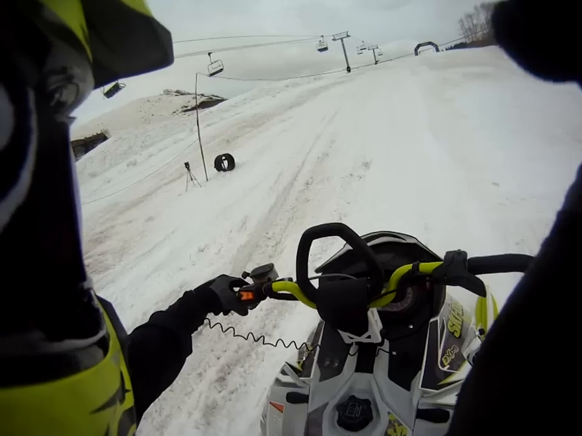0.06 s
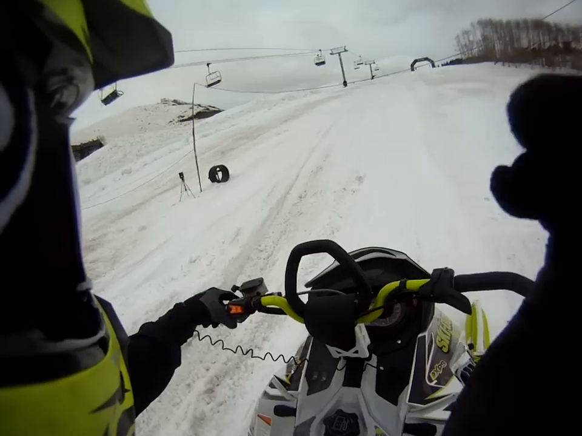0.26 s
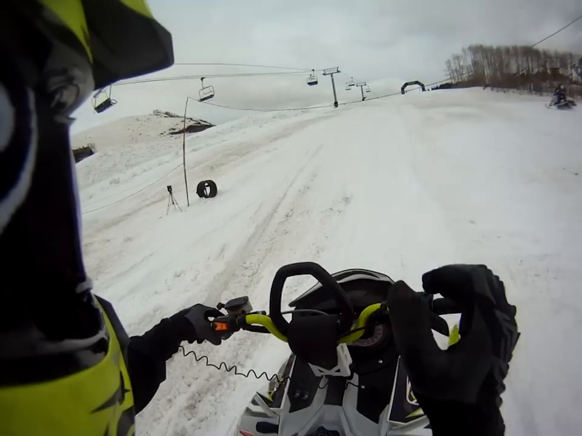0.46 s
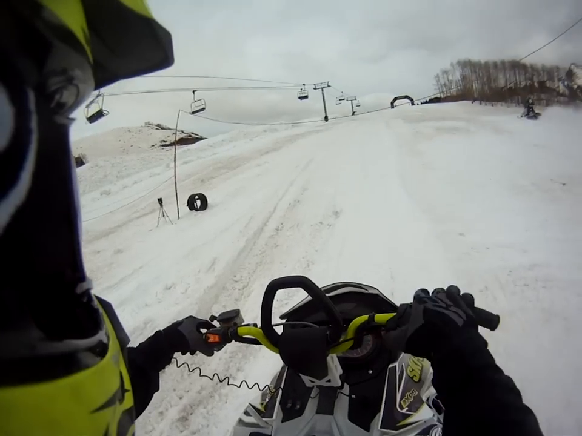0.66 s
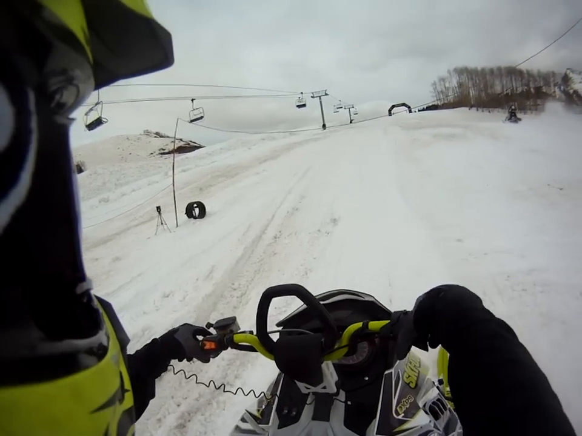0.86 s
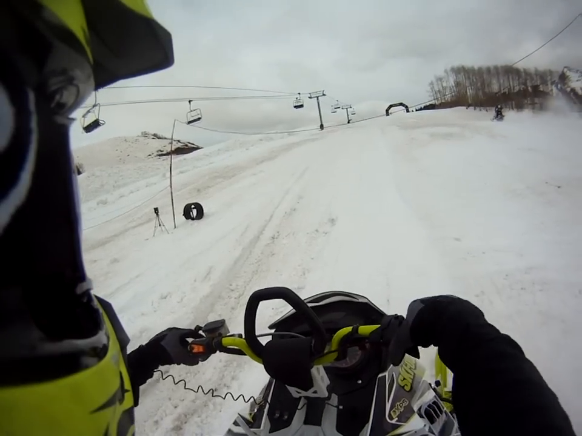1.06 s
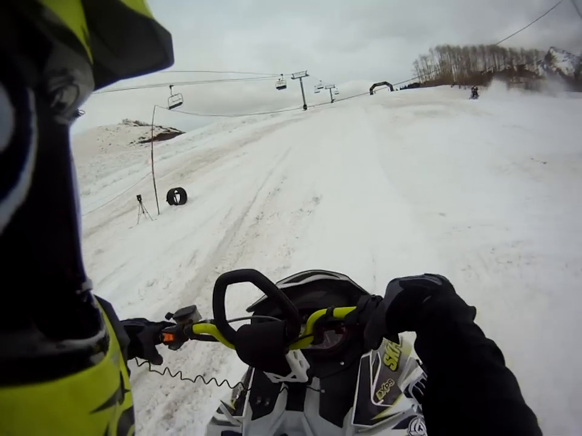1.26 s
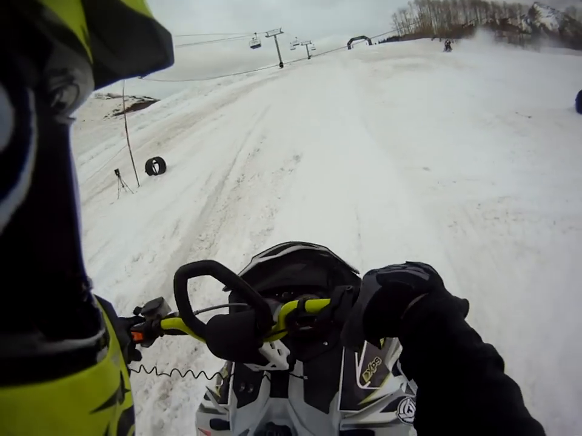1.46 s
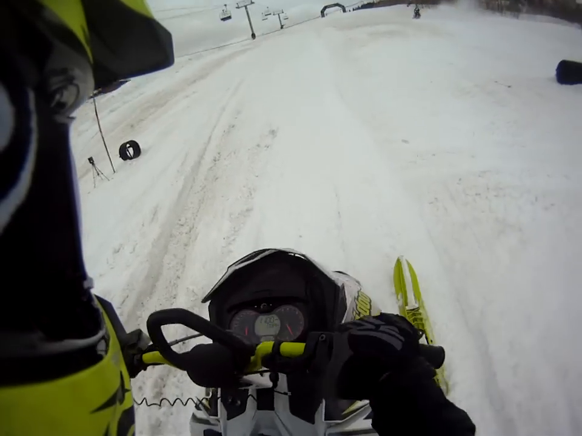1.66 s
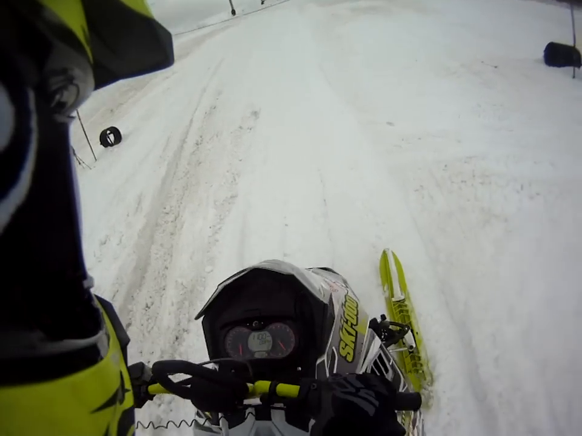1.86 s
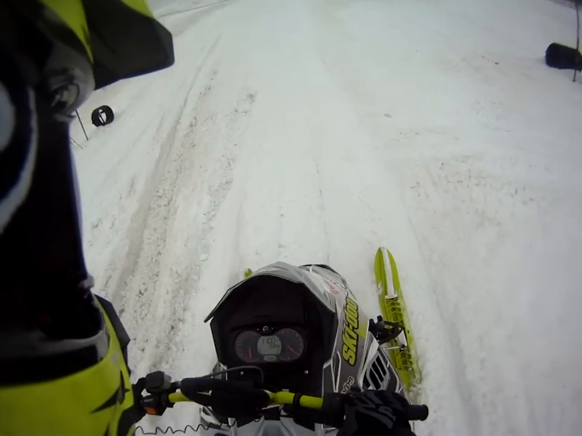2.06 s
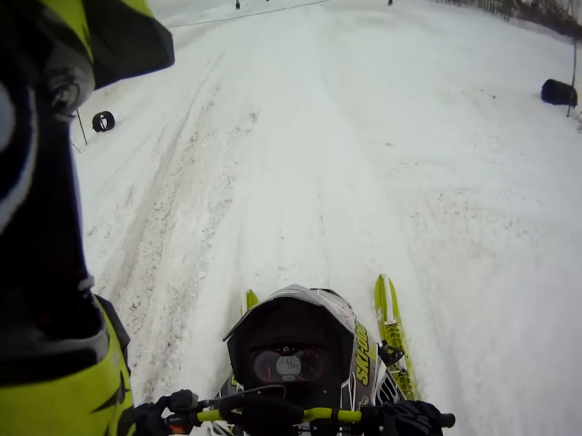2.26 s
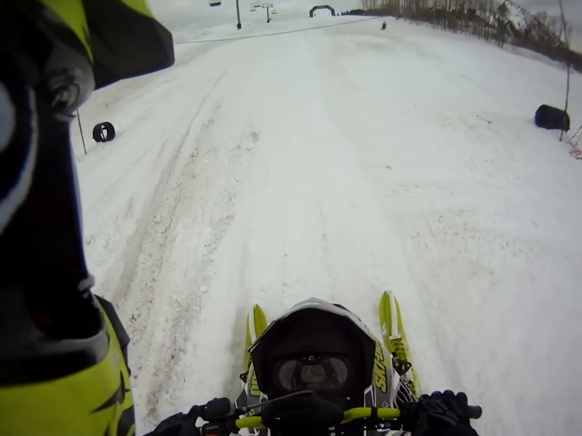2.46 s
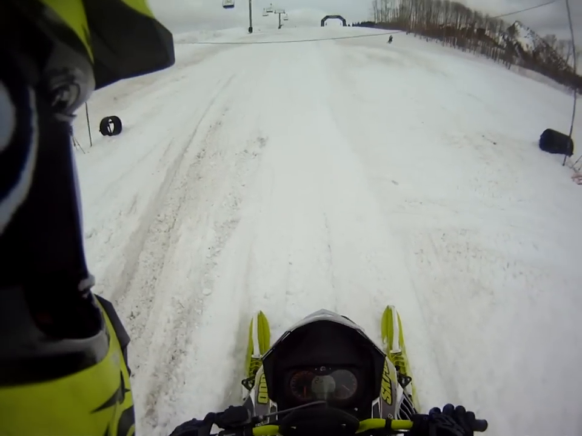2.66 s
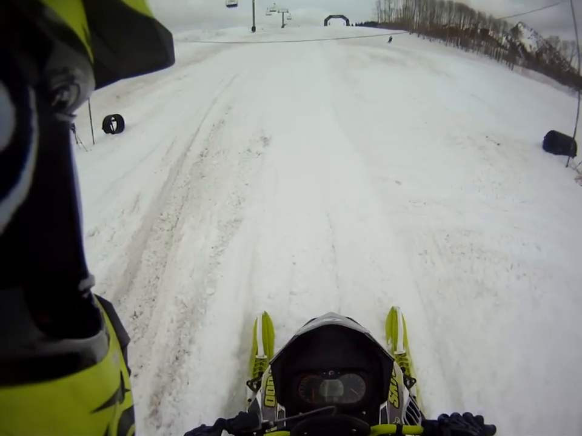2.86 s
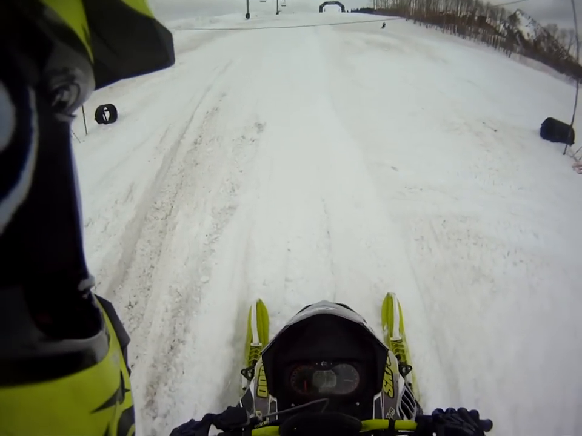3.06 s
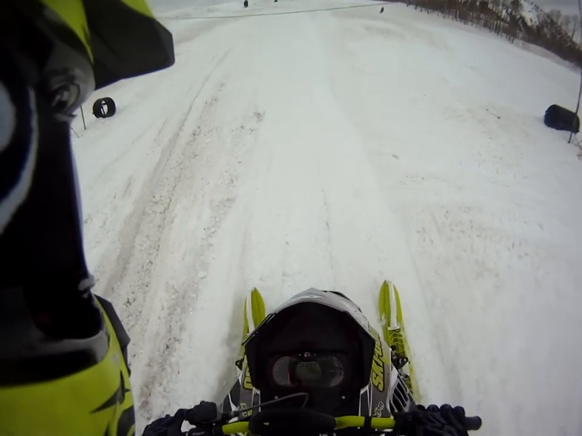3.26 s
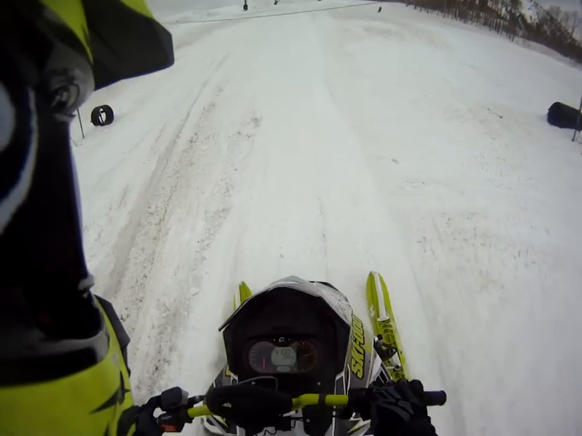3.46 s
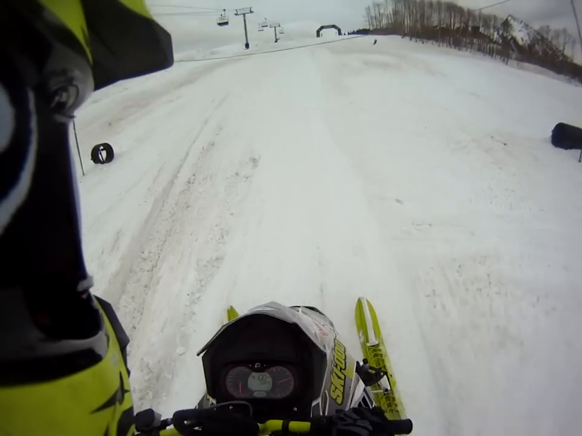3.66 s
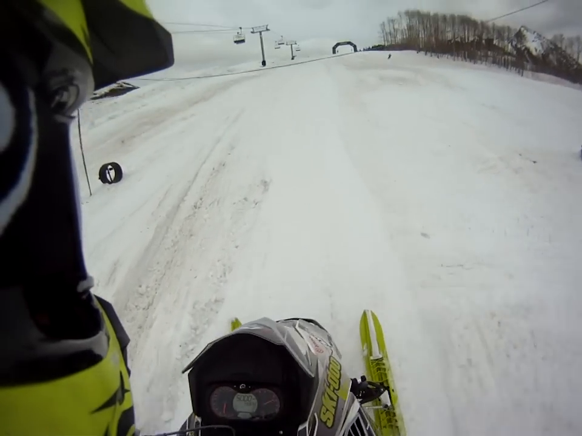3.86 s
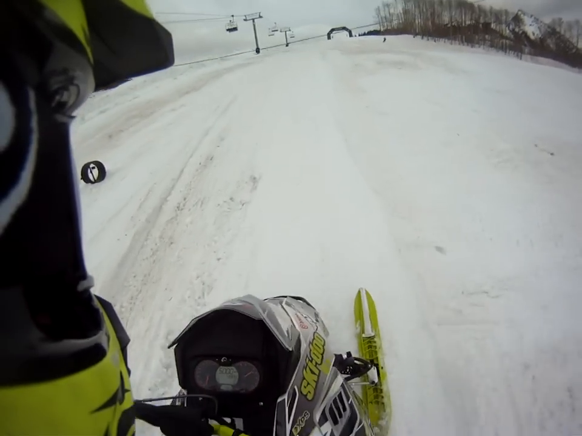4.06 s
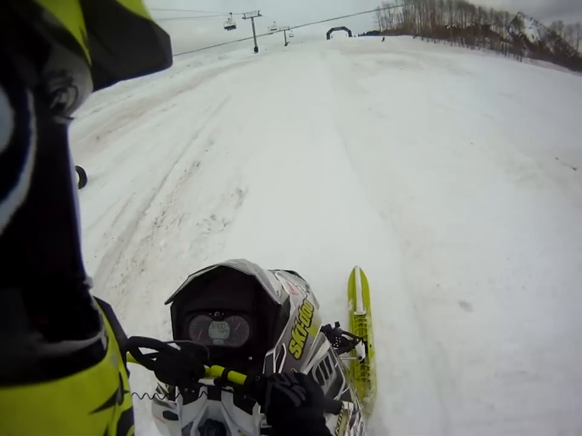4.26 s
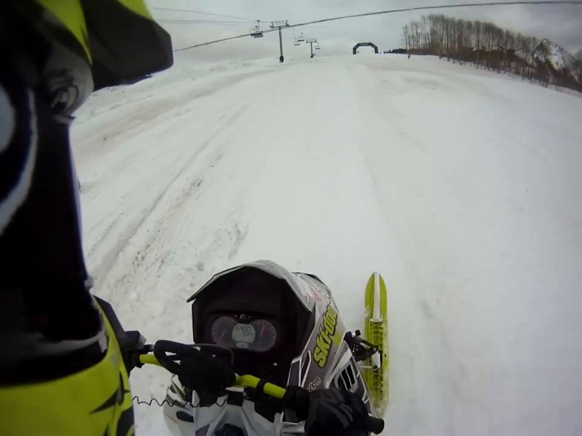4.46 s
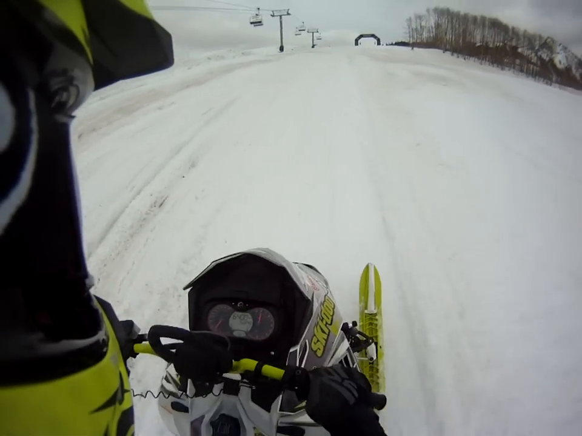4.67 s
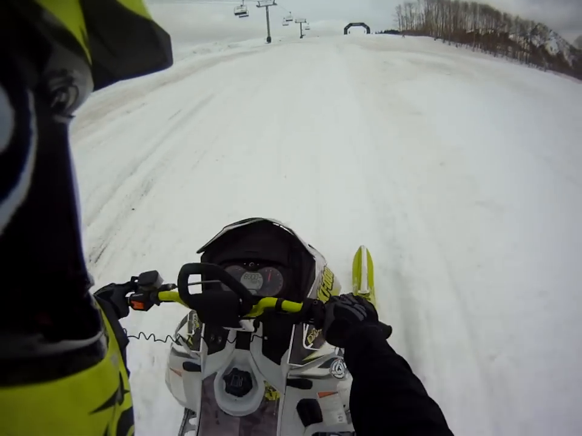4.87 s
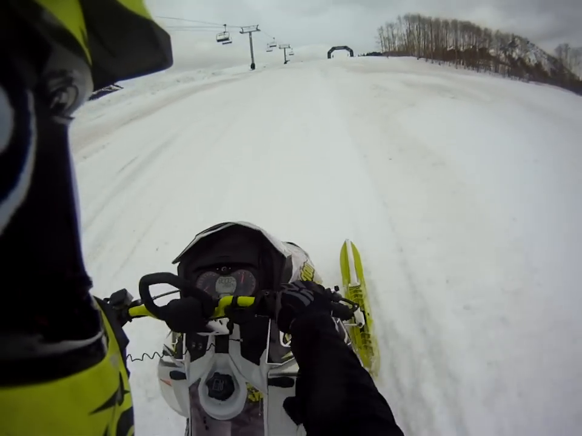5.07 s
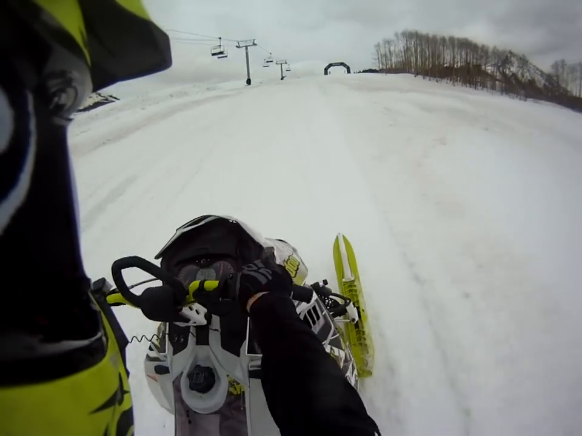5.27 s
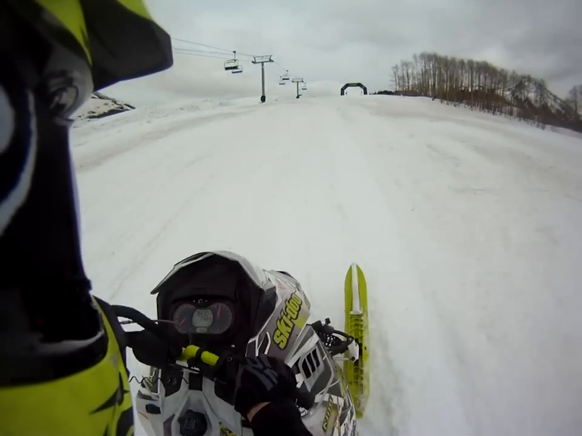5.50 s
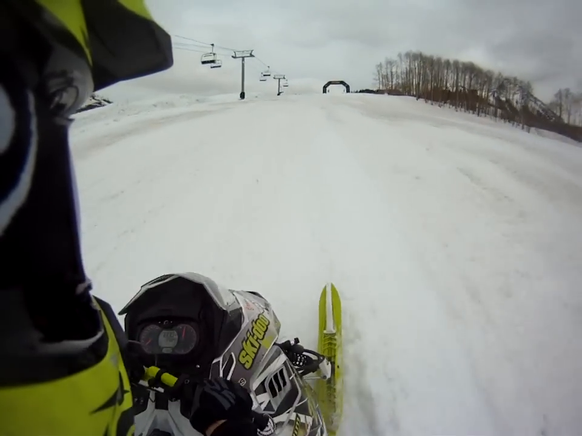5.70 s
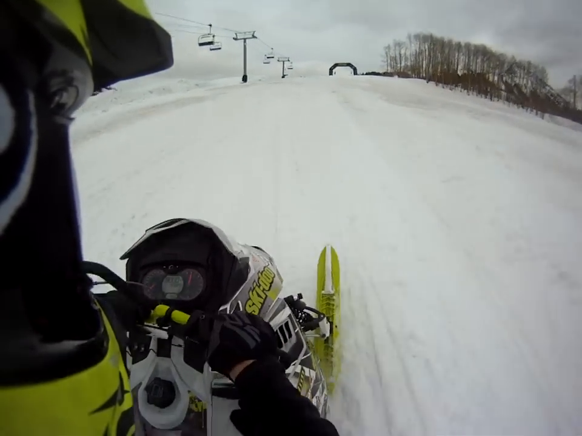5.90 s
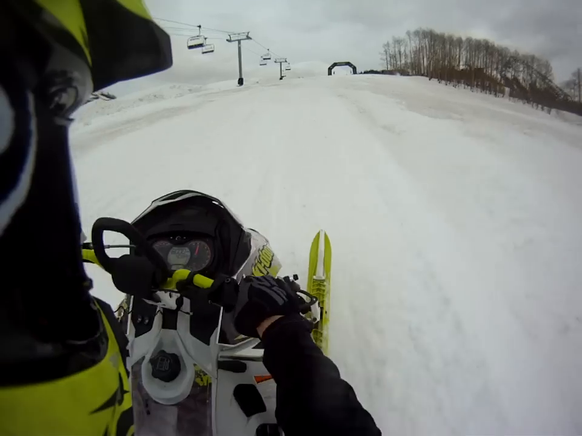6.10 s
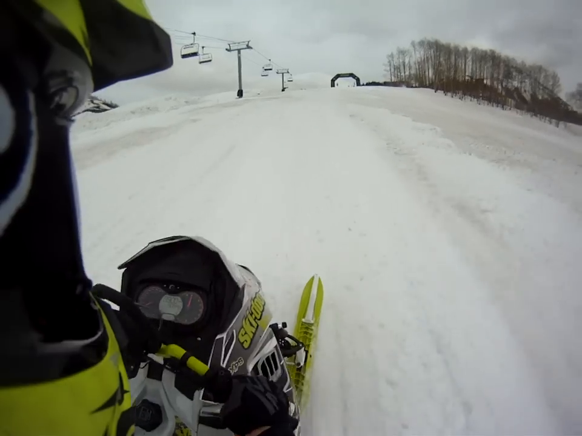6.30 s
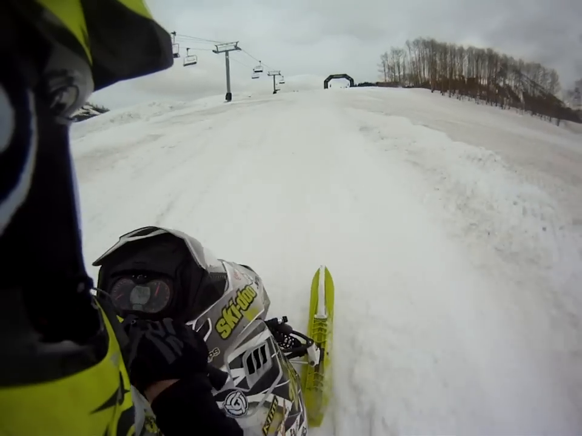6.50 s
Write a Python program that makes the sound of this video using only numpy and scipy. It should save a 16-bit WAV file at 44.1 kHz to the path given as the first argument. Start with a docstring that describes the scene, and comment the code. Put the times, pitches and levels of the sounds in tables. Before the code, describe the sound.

A two-stroke snowmobile idles with a low, gruff putter, heard close and dry from the rider's helmet. Nylon swishes at the start, and at about 0.2 seconds a glove hits the microphone with a loud clack, thuds and scuffs, leaving a brief low hum. Softer sleeve swishes fade by 1.5 seconds. At 1.6 seconds the engine revs up with a booming bark, easing off at 2 seconds with a few small pops. From 2.4 to 4 seconds, about six quick throttle blips push the pitch higher, with raspy intake, drive whirr and short dips between them. After a brief cut at 4 seconds, the throttle opens fully and the engine climbs into a loud, high howl by 4.5 seconds, holding with a slight waver until the end, around 6.5 seconds. Track hiss, churning snow and a thin sizzle build underneath, with low wind gusts near 5 and 6.5 seconds.

```python
"""Snowmobile pulling away

A two-stroke twin, heard from the rider's helmet, idles, is blipped, surges off and climbs at full revs.
Firings boom and bark in the exhaust until the tuned pipe howls; intake rasp, drive whirr, track noise
and wind rise along the way. At the start nylon swishes and a glove knocks and scuffs the camera,
whose slow sample-and-hold mirrors everything into a thin treble sizzle."""
import sys
import numpy as np
from scipy import signal
from scipy.fft import rfft, irfft
from scipy.io import wavfile
from scipy.ndimage import uniform_filter1d

SR = 44100
rng = np.random.default_rng(int(sys.argv[2]) if len(sys.argv) > 2 else 0)


def inscribe(sig):
    """Save sig as 16-bit PCM at rate SR to the path in sys.argv[1].

    A 1-D sig is mono; a 2-D sig holds one channel per row.
    Samples are clipped to [-1, 1] before scaling.
    """
    pcm = np.round(np.clip(np.atleast_2d(sig).T, -1, 1) * 32767)
    wavfile.write(sys.argv[1], SR, pcm.astype(np.int16))


N = 288414
T = np.arange(N) / SR


def undb(db):
    """Decibels to gain."""
    return np.exp(np.asarray(db) * np.log(10) / 20)


def curves(rows, at=T):
    """A table's later columns, interpolated along its first (time by default)."""
    keys, *columns = np.transpose(rows)
    return [np.interp(at, keys, column) for column in columns]


def noise():
    """White noise."""
    return rng.standard_normal(N)


def walk(rate):
    """Smooth random modulation: a new value every 1 / rate s, spread near 1."""
    hold = max(int(SR / rate), 1)
    held = np.repeat(rng.standard_normal(size=8192)[:N // hold + 1], hold)[:N]
    return 1.19 * uniform_filter1d(uniform_filter1d(held, hold), hold)


def ramp(start_s, length_s):
    """A linear rise from 0 to 1."""
    return np.clip((T - start_s) / length_s, 0, 1)


def swell(s, half_s):
    """A bell-shaped envelope around time s."""
    return np.exp(-.5 * ((T - s) / half_s) ** 2) * (np.abs(T - s) < 6 * half_s)


def colour(x, points):
    """Ring x through a resonant body with this EQ curve; rms 1."""
    size = 16384
    hz, db = np.transpose(points)
    grid = np.maximum(np.arange(size // 2 + 1) * SR / size, 1)
    rolloff_db = 40 * np.log10(np.maximum(grid / hz[-1], 1))
    gain = undb(np.interp(np.log(grid), np.log(hz), db) - rolloff_db)
    cepstrum = irfft(np.log(gain))
    cepstrum[1:size // 2] *= 2  # minimum phase: the ring follows the hit
    cepstrum[size // 2 + 1:] = 0
    rung = signal.fftconvolve(x, irfft(np.exp(rfft(cepstrum))))[:N]
    return rung / np.std(rung)


def even(x):
    """Hold the rms at 1 whatever the firing rate."""
    size = SR // 16
    return x / np.sqrt(uniform_filter1d(uniform_filter1d(x * x, size), size) + 1e-9)


# Low wind buffet (frequency [Hz], level [dB])
BUFFET_EQ = [(15, -11), (28, -12), (39, -6), (52, -17), (90, -17), (200, -55), (600, -63)]
# Gusts, jolts and a lull (time [s], level change [dB], half length [s])
GUSTS = [(4.321, -4, 0.097), (5.09, 10, 0.063), (6.479, 7, 0.15)]
def wind(rest_db=-49.5, rise_db_per_s=1.45, rolls_s=1.6):
    """Air and the ride shake the helmet, more once the sled rolls."""
    bed_db = rest_db + rise_db_per_s * np.maximum(T - rolls_s, 0)
    gust_db = sum(db * swell(s, half) for s, db, half in GUSTS)
    return colour(noise(), BUFFET_EQ) * undb(bed_db + gust_db + 0.66 * walk(9))


# Papery jacket cloth (frequency [Hz], level [dB])
RUSTLE_EQ = [(500, -12), (1100, -4), (1750, 5.5), (2300, -16), (2800, -6), (3600, -4), (5000, -12.5)]
def jacket(level_db=-45.5, fades_s=0.59, fade_db_per_s=15):
    """A broad rustle of cloth that dies away as the arm settles."""
    fade_db = fade_db_per_s * np.maximum(T - fades_s, 0)
    return colour(noise(), RUSTLE_EQ) * ramp(0.035, 0.13) * undb(level_db - fade_db)


# The arm reaches for the bar (time [s], level [dB], half length [s], centre [Hz])
SWISHES = [(0.03, -43, 0.05, 2470), (.125, -42.5, 0.047, 2400), (0.144, -45, 0.12, 1800),
           (0.497, -51, 0.17, 3640), (1.03, -54.5, 0.073, 3824), (1.331, -60, 0.096, 4570)]
def sleeve(skirt_db=-15.5):
    """Ribbed nylon slides on itself: each stroke hisses around its own pitch."""
    out = np.zeros(N)
    for s, db, half, hz in SWISHES:
        band = [(hz / 2, 2 * skirt_db), (hz / 1.22, skirt_db), (hz, 0),
                (hz * 1.05, skirt_db), (hz * 2, 2 * skirt_db)]
        out += colour(noise(), band) * undb(db) * swell(s, half)
    return out


# Bright shell clack and dull glove scrape (frequency [Hz], level [dB])
CLACK_EQ = [(100, -3), (260, -1), (450, -8), (700, -5), (1500, 0), (2300, 0), (2800, -6), (3450, 7),
            (3950, -7), (5500, -10)]
SCUFF_EQ = [(200, -17), (550, -10), (900, -1.5), (1700, 6), (2200, 4.5), (2700, -25), (3700, -28),
            (4400, -21), (5000, -11), (5600, -27)]
# Hits and slides on the shell (time [s], level [dB], half length [s])
KNOCKS = [(.197, -21, .0016), (.203, -29, .002), (.2117, .5, .0019), (.2143, -9, .0009)]
SCUFFS = [(.18, -38, .03), (.272, -26, .009), (.287, -20, .006), (.327, -30, .008)]
# Thuds of the shoved helmet (time [s], envelope level [dB], pitch [Hz])
SHOVES = [(.147, -23, 90), (.17, -18, 40), (.1935, -11, 60), (.1958, -11, 190), (.2115, -6.5, 160),
          (.246, -18, 100)]
def glove(ring_hz=69.3, ring_db=-24.0, ring_t60=1.2):
    """The hand knocks, scuffs and shoves the camera, and leaves its mount humming."""
    knocks = colour(noise(), CLACK_EQ) * sum(undb(db) * swell(s, half) for s, db, half in KNOCKS)
    grip = undb(3 * walk(500))
    scuffs = colour(noise() * grip, SCUFF_EQ) * sum(undb(db) * swell(s, half) for s, db, half in SCUFFS)
    shoves = sum(undb(db) * swell(s, 0.25 / hz) * np.sin(2 * np.pi * hz * (T - s))
                 for s, db, hz in SHOVES)
    hum_attack = np.interp(T, [.22, .28, .38], [0, .7, 1])
    hum_db = ring_db - 60 * np.maximum(T - .39, 0) / ring_t60
    hum = hum_attack * undb(hum_db) * np.sin(2 * np.pi * ring_hz * T)
    return knocks + scuffs + shoves + hum


# Throttle squeezes (opens [s], shuts [s], attack [s], opening [0-1],
# starting firing rate [Hz], peak firing rate [Hz], dip on letting go [dB])
BLIPS = [(1.64, 2.013, 0.19, 0.82, 38.72, 92.74, -4), (2.422, 2.589, 0.041, 0.36, 77.9, 84.6, -1),
         (2.722, 2.856, .05, 0.11, 80.1, 86.8, -6), (2.925, 3.2, 0.13, 0.8, 84.9, 153.7, -3),
         (3.277, 3.436, 0.042, 0.65, 151.3, 177.2, -1.5), (3.522, 3.662, 0.033, 0.63, 165.3, 180.3, -5),
         (3.763, 3.956, 0.079, 0.93, 163.8, 199.6, -26)]
def throttle(pinned_s=4.04, pinned_attack_s=0.035, release_s=0.024, cut_delay_s=0.064):
    """The thumb blips, then holds full throttle; the firing cuts out briefly after each blip."""
    opening, cut_db = ramp(pinned_s, pinned_attack_s), 0
    for opens, shuts, attack, depth, _, _, drop_db in BLIPS:
        opening = opening + depth * ramp(opens, attack) * (1 - ramp(shuts, release_s))
        cut_db = cut_db + drop_db * swell(shuts + cut_delay_s, half_s=0.019)
    return opening, cut_db


# Engine pitch on the climb (time [s], firing rate [Hz])
CLIMB = [(4.05, 181.3), (4.15, 207.8), (4.21, 219.8), (4.36, 255.2), (4.42, 262.8), (4.51, 271.5),
         (4.62, 269.3), (4.75, 272.7), (4.96, 267.5), (5.07, 265.9), (5.25, 261.7), (5.58, 267.9),
         (5.68, 268.9), (5.89, 264.6), (6.04, 257.2), (6.11, 261.9), (6.25, 271.3), (6.48, 261.9),
         (6.54, 263.6)]
def revs(idle_hz=37.49, idle_drift=0.01198, overrun_s=.018):
    """Firing rate: the crank winds up with each squeeze and coasts to the next, until the climb."""
    first_blip_s = BLIPS[0][0]
    marks = [(0, idle_hz), (first_blip_s - .25, idle_hz)]
    for opens, shuts, _, _, before_hz, peak_hz, _ in BLIPS:
        marks += [(opens, before_hz), (shuts + overrun_s, peak_hz)]
    s, hz = np.transpose(marks + [CLIMB[0]])
    steps = np.arange(len(s))
    leg, part = np.divmod(np.interp(T, s, steps), 1)
    eased = np.interp(leg + np.sin(np.pi * part / 2) ** 2, steps, hz)
    wander = 1 + idle_drift * walk(6) * (1 - ramp(first_blip_s, 0.099))
    return np.where(T < s[-1], eased * wander, curves(CLIMB)[0])


def firings(cycles, hz):
    """One pulse per firing, each with its own punch; at higher revs one cylinder hits harder."""
    scatter_db = np.interp(hz, [38, 85, 160], [1.5, 2.2, 1.1])
    limp_db = np.interp(hz, [100, 165, 230], [0, 1.6, .8])
    at = np.flatnonzero(np.diff(np.floor(cycles)) > 0)
    count = np.ceil(cycles[at])
    late = (count - cycles[at]) / (cycles[at + 1] - cycles[at])  # fraction of a sample
    punch = undb(scatter_db[at] * noise()[:len(at)] + limp_db[at] * np.cos(np.pi * count))
    pulses = np.zeros(N)
    pulses[at], pulses[at + 1] = punch * (1 - late), punch * late
    return pulses


def puffs(cycles, decay, steady):
    """Noise that bursts at each firing and sinks towards a steady floor."""
    return noise() * (steady + np.exp(-(cycles % 1) / decay))


# Echoes in the expansion chamber and silencer (round trip [s])
ROUND_TRIPS = (.0021, .0034, .0053)
def chambers(x, echo):
    """Each pulse bounces to and fro and leaves as a train of echoes."""
    for trip_s in ROUND_TRIPS:
        size = int(trip_s * SR)
        trips = np.pad(x, (0, -N % size)).reshape(-1, size)
        x = signal.lfilter([-echo, 1], [1, -echo], trips, axis=0).ravel()[:N]
    return x


# Track sizzle and churning snow (frequency [Hz], level [dB])
HISS_EQ = [(1200, -31), (2300, -1), (2600, -7.5), (3100, -6), (3500, 1), (3750, -4), (4100, -6.5),
           (4700, -14.5), (5050, -11), (5400, -4), (5900, -12)]
ROAR_EQ = [(50, -7), (130, -7.5), (230, 2), (400, -6), (560, -1), (720, 1), (950, 0.5), (1400, -3),
           (2500, -24)]
def track(cycles, train, hz, level_db):
    """The track hisses, buzzier with revs, and its roar in the snow swells as the sled rolls."""
    tonal = np.interp(hz, [80, 250], [.05, .42])
    spray = np.sqrt(1 - tonal) * even(colour(puffs(cycles, decay=1.0, steady=1.0), HISS_EQ))
    buzz = np.sqrt(tonal) * even(colour(train, HISS_EQ))
    hiss = (spray + buzz) * undb(level_db + 1.5 + 0.98 * walk(35))
    rolling_db = np.interp(T, [1.6, 3.1], [-7, 0])
    roar = colour(noise(), ROAR_EQ) * undb(level_db - 4.5 + 0.92 * walk(12) + rolling_db)
    return hiss + roar


# Narrow midrange whirr (frequency [Hz], level [dB])
WHIRR_EQ = [(700, -20.5), (980, -27.5), (1100, -2), (1180, 0), (1240, -2), (1330, -24.5), (1700, -30.5)]
def drive(hz, level_db, waver_db=1.0):
    """Belt and chain case whirr, grainier with speed and ducking a little at peak revs."""
    grain_db = np.interp(hz, [40, 160], [.3, 1.4])
    duck_db = 1.7 * np.clip((hz - 232) / 26, 0, 1)
    whirr = colour(noise() * undb(grain_db * walk(60)), WHIRR_EQ)
    return whirr * undb(level_db + waver_db * walk(7.9) - duck_db)


# Airbox ring: broad under the gas, narrow under the pulses (frequency [Hz], level [dB])
RASP_EQ = [(700, -50.5), (1300, -19.5), (1500, -2), (1600, -3.5), (1670, -10), (1820, 6), (1950, -3.5),
           (2100, 2), (2280, -6), (2550, -37.5), (4000, -48)]
AIRBOX_EQ = [(1000, -27), (1400, -14.5), (1540, -1.5), (1660, -18.5), (1780, 3.5), (1880, 2), (1990, -1.5),
             (2140, -14), (2300, -57), (2700, -26.5)]
def intake(cycles, train, hz, level_db):
    """Gas rasps and the airbox snarls with the firings; at peak revs the snarl yields to the howl."""
    rates_hz = [40, 70, 170, 228, 258]
    gas_db = level_db + np.interp(hz, rates_hz, [-1, -4, -5.5, -6.5, -6.5])
    snarl_db = level_db + np.interp(hz, rates_hz, [-12, -2.5, -1.5, -1, -13])
    gas = even(colour(puffs(cycles, decay=.3, steady=.5), RASP_EQ)) * undb(gas_db)
    snarl = even(colour(train, AIRBOX_EQ)) * undb(snarl_db)
    return gas + snarl


# Exhaust low end, throat and edge (frequency [Hz], level [dB])
BOOM_EQ = [(30, -38), (75, -27), (110, 7), (150, 8.5), (185, -5), (230, -6), (400, -52)]
BARK_EQ = [(150, -21.5), (250, 1.5), (330, -0.5), (385, 0.5), (430, 2), (480, -1), (530, 8), (590, 1.5),
           (690, -16), (850, -8), (950, -10), (1400, -54.5)]
BITE_EQ = [(500, -15), (700, -9), (790, 0.5), (880, 6.5), (1060, -11), (1200, 4), (1450, -21)]
def exhaust(cycles, pulses, hz, opening, cut_db, boom_db, bark_db):
    """Firings thump the silencer and bark in the pipe: gruff at idle, cleaner and brighter with revs."""
    rough_zone = np.exp(-((hz - 87) / 20) ** 2)  # off load the engine stumbles around 87 Hz
    drop_db = cut_db + 4 * walk(28.1) * (1 - opening) * rough_zone
    boom = even(colour(pulses, BOOM_EQ))
    train = chambers(pulses, echo=0.46)
    clean = np.interp(hz, [40, 90, 160], [.6, .92, .98])
    gruff = even(colour(puffs(cycles, decay=0.41, steady=0.13), BARK_EQ))
    bark = np.sqrt(clean) * even(colour(train, BARK_EQ)) + np.sqrt(1 - clean) * gruff
    bite = even(colour(train, BITE_EQ)) * undb(np.interp(hz, [90, 140, 175], [-22, -10, -4]))
    # the bark dips less than the boom: the coasting engine still pumps the pipe
    return boom * undb(boom_db + drop_db) + (bark + bite) * undb(bark_db + 0.88 * drop_db)


# Lone hard firings on the overrun (time [s], level [dB])
POPS = [(2.112, -31), (2.125, -36), (2.204, -40), (2.666, -41)]
def pops(decay_s=0.0083):
    """A late charge lights and cracks through pipe and intake."""
    burst = sum(undb(db) * np.exp(-np.abs(T - s) / decay_s) * (T >= s) for s, db in POPS)
    return burst * (colour(noise(), BARK_EQ) + 0.72 * colour(noise(), RASP_EQ))


# The howl's strong harmonics (multiple of the firing rate)
HOWL_ORDERS = (1, 2, 3, 4, 6, 7, 8)
# Their voicing (level [dB], echo fading depth [factor], random dropout depth [dB])
HOWL_VOICING = [(-26.5, 2.46, 0.4), (-21.5, 1.45, 1), (-21.5, 1.81, .2), (-22, 1.28, -1), (-21.5, .5, 5.5),
                (-19, 0.021, 6.5), (-23, 0.11, 4.5)]
# Weak harmonics, the odd ones from unequal cylinders (multiple of the crank rate)
SIDE_ORDERS = (1, 3, 5, 9, 10, 13, 15, 18, 20, 22, 26)
# Their balance (level against the strong harmonics' mean [dB])
SIDE_LEVELS = [-28.5, -27.5, -25.5, -18, -12, -18, -18, -18, -21, -28, -20]
# The echo off sled and snow shifts as the rider sways (time [s], extra path [m])
ECHO_PATH = [(4.25, 1.73), (4.45, 1.41), (4.56, 1.53), (4.68, 1.605), (4.9, 1.574), (5.07, 1.486),
             (5.24, 1.567), (5.41, 1.64), (5.58, 1.69), (5.83, 1.59), (5.97, 1.59), (6.13, 1.667),
             (6.32, 1.606), (6.5, 1.52)]
def howl(cycles, hz, flutter_db=0.392, side_flutter_db=4.5, dispersion=.4, sound_m_s=343):
    """The tuned pipe sings harmonics, smeared by its cones; the strong ones phase against their echo."""
    path_m, = curves(ECHO_PATH)
    lag = 2 * np.pi * hz * path_m / sound_m_s
    out = np.zeros(N)
    for k, (db, depth, dropout_db) in zip(HOWL_ORDERS, HOWL_VOICING):
        echo_db = depth * 10 * np.log10(1 + .5 ** 2 + np.cos(k * lag))  # comb of a half-strength echo
        unsteady_db = flutter_db * k * walk(55) - dropout_db * walk(9) ** 2
        out += undb(db + echo_db + unsteady_db) * np.cos(2 * np.pi * k * cycles - dispersion * k * k)
    body_db = np.mean(HOWL_VOICING, axis=0)[0]
    for k, db in zip(SIDE_ORDERS, SIDE_LEVELS):
        gain = undb(body_db + db + side_flutter_db * walk(30))
        out += gain * np.cos(np.pi * k * cycles - dispersion * k * k)
    return np.sqrt(2) * out


# Base mix, throttle shut (firing rate [Hz], boom [dB], bark [dB], intake [dB], drive [dB], track [dB])
REV_MIX = [(36.2, -41.5, -52.5, -55, -54.5, -63), (51.4, -36.5, -44, -51, -52, -62),
           (89.7, -41, -42, -45.5, -49, -56), (115, -40.5, -44.5, -43, -38.5, -53.5),
           (149, -35, -40, -36.5, -34, -48), (172.3, -36.5, -38.5, -35.5, -26.5, -44),
           (206.5, -34.5, -33, -35, -32.5, -39), (259, -34, -25, -26, -24, -28.5),
           (252, -33, -26, -27, -26, -32.5)]
def engine(pipe_from_hz=201.6, pipe_span_hz=48):
    """The crank paces every part; the bark crossfades to the howl as the pipe comes into tune."""
    hz = revs()
    opening, cut_db = throttle()
    cycles = np.cumsum(hz * (1 + .0016 * walk(70))) / SR
    pulses = firings(cycles, hz)
    train = chambers(pulses, echo=.2)
    boom_db, bark_db, intake_db, drive_db, track_db = curves(REV_MIX, at=hz)
    boom_db += 4 * opening  # load pushes the layers up
    bark_db += 7 * opening
    intake_db += 10.5 * opening + 0.34 * cut_db
    track_db += 2.5 * opening + .15 * cut_db
    on_pipe = np.clip((hz - pipe_from_hz) / pipe_span_hz, 0, 1)
    pipe = (1 - on_pipe) * exhaust(cycles, pulses, hz, opening, cut_db, boom_db, bark_db)
    pipe += on_pipe * howl(cycles, hz)
    rasp = intake(cycles, train, hz, intake_db)
    return pipe + rasp + drive(hz, drive_db) + track(cycles, train, hz, track_db) + pops()


def scene():
    """The mono mix at the helmet; open snow gives no reverb."""
    return (engine() + glove() + sleeve() + jacket() + wind())[None]


def record(dry):
    """The camera's slow sample-and-hold mirrors the sound into sizzle; peaks and top end are shaved."""
    band_hz, hold_hz, top_hz = 5550, 12000, 15500
    band = signal.sosfilt(signal.ellip(7, .2, 60, band_hz, fs=SR, output="sos"), dry)
    slow = signal.resample_poly(band, hold_hz, SR, axis=-1)
    held = signal.resample_poly(np.repeat(slow, 4, axis=-1), SR, 4 * hold_hz, axis=-1)[:, :N]
    return signal.sosfilt(signal.ellip(10, .2, 70, top_hz, fs=SR, output="sos"), np.clip(held, -1, 1))


dry = scene()
out = record(dry)
inscribe(out)
```